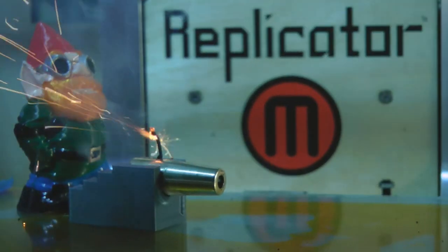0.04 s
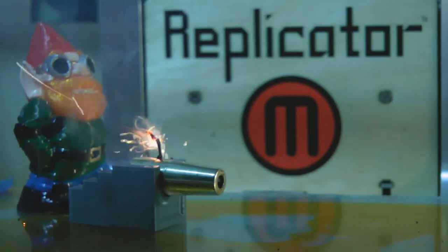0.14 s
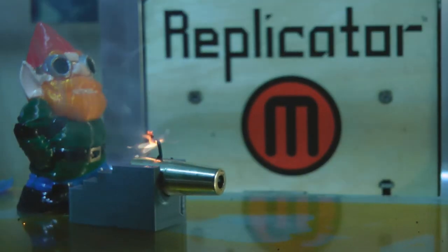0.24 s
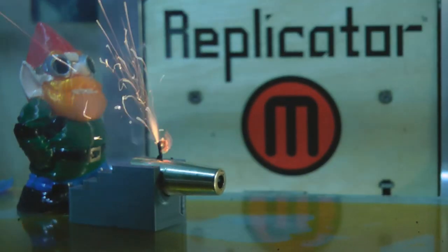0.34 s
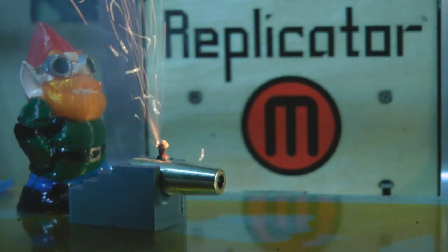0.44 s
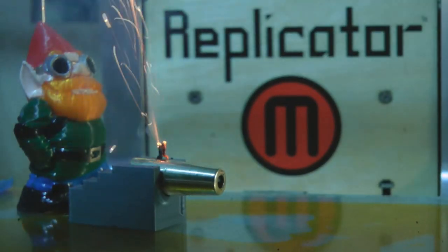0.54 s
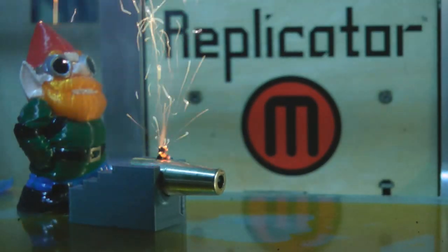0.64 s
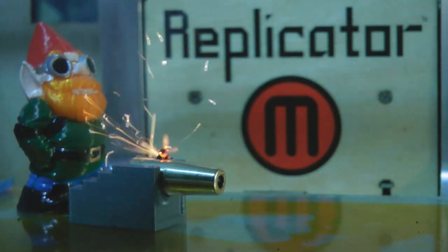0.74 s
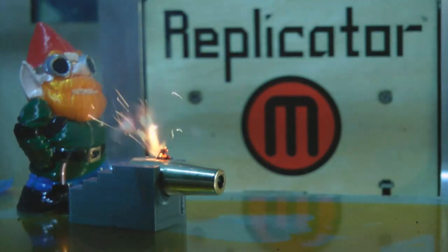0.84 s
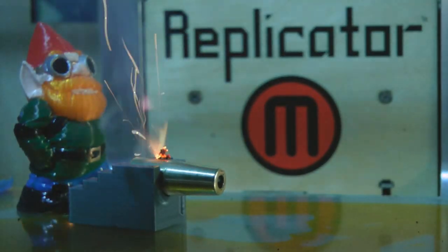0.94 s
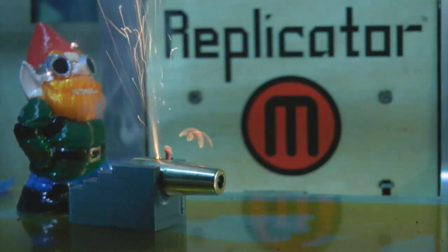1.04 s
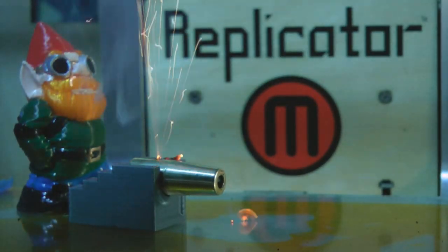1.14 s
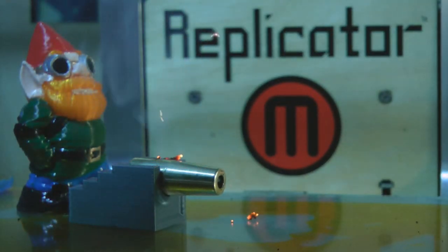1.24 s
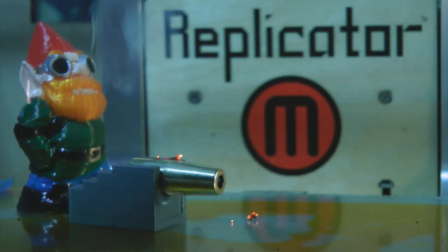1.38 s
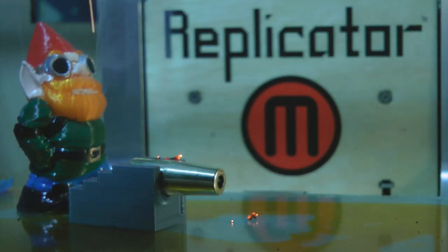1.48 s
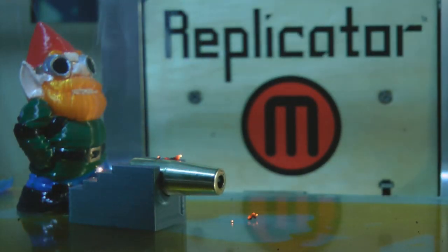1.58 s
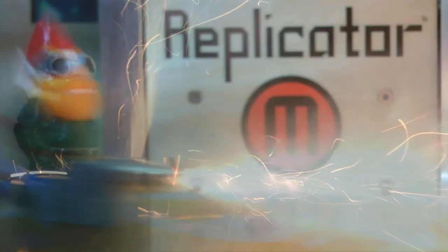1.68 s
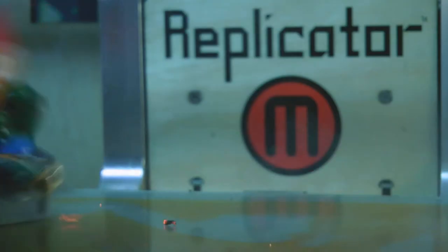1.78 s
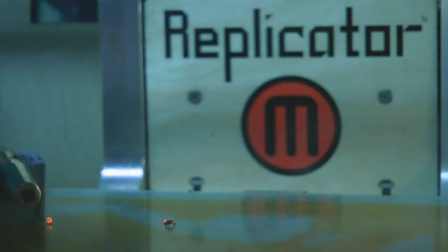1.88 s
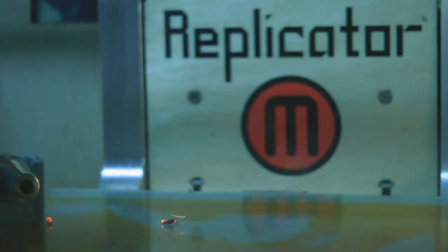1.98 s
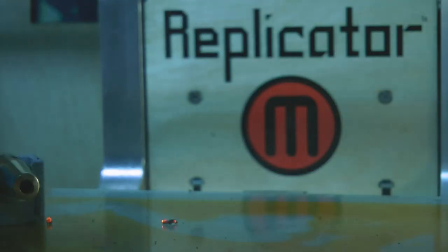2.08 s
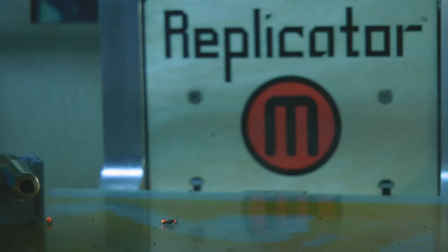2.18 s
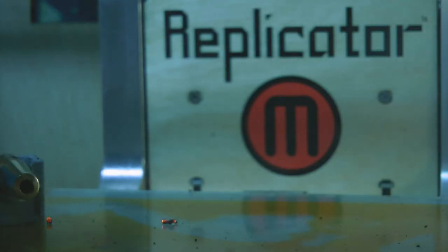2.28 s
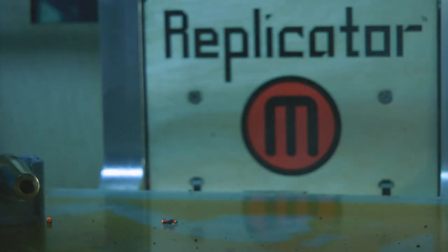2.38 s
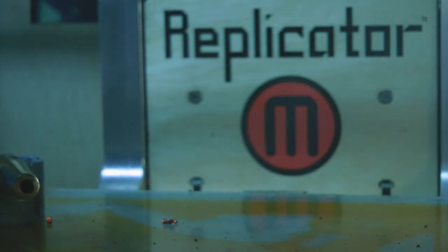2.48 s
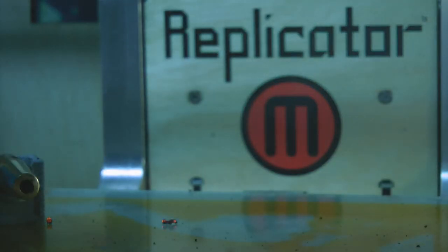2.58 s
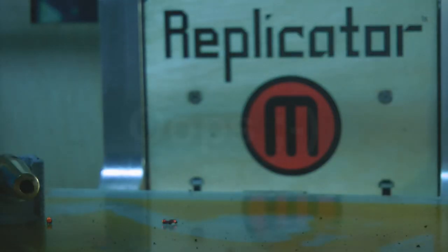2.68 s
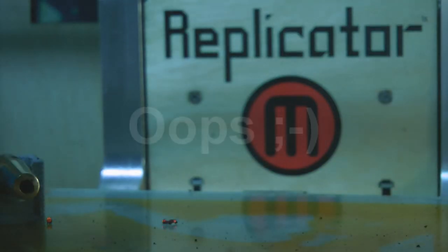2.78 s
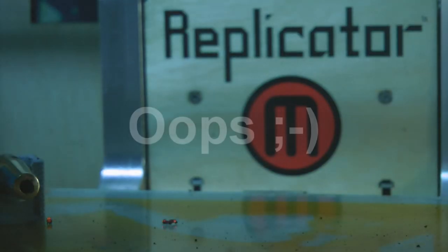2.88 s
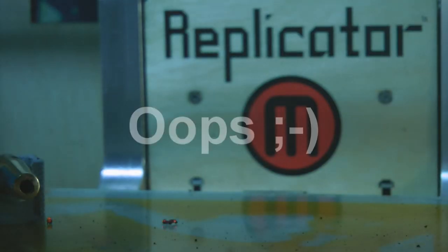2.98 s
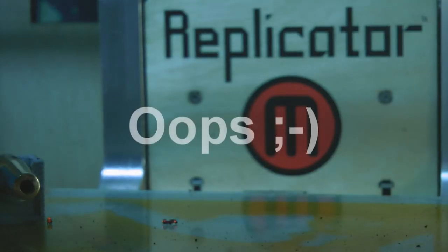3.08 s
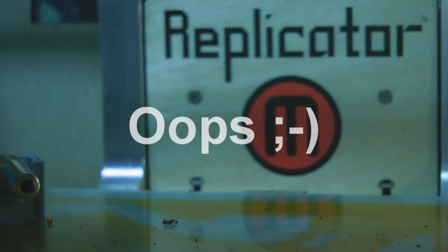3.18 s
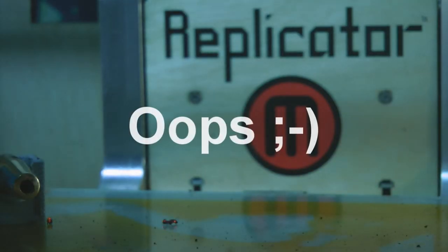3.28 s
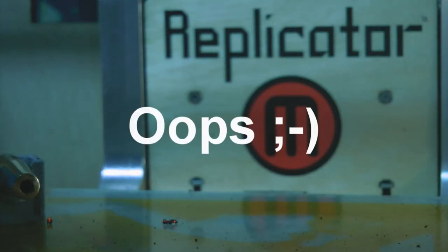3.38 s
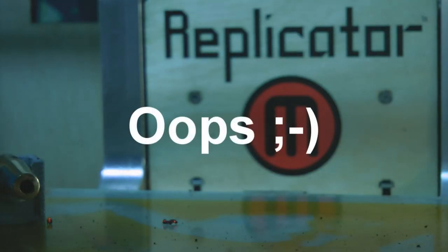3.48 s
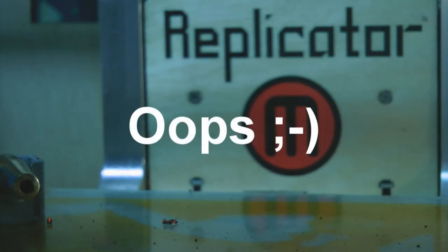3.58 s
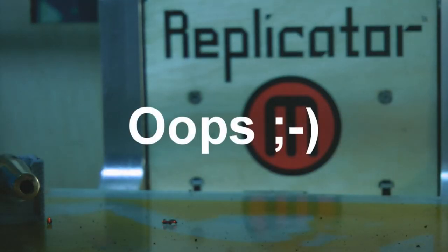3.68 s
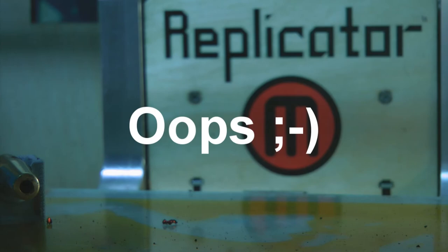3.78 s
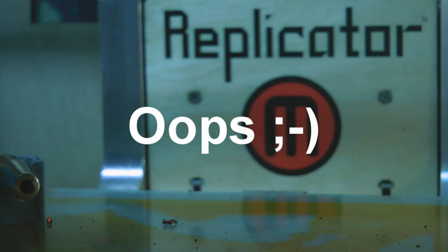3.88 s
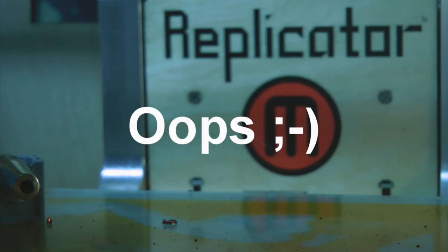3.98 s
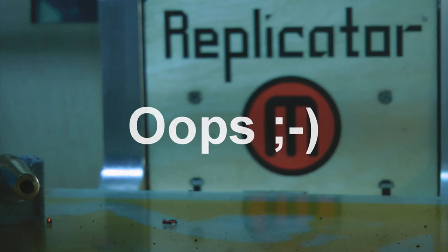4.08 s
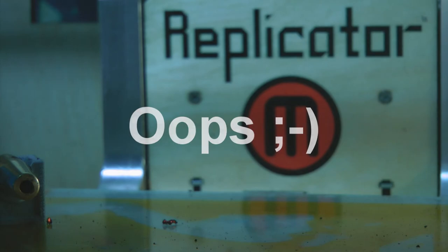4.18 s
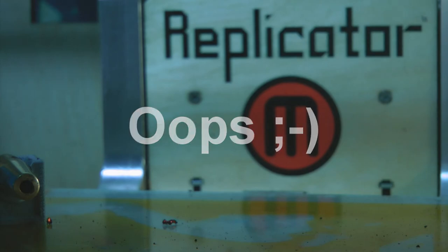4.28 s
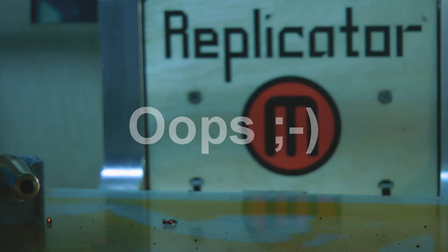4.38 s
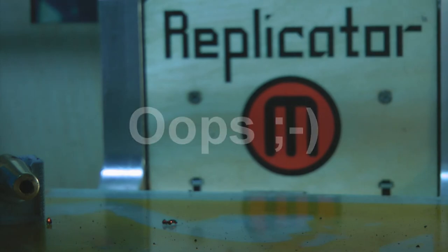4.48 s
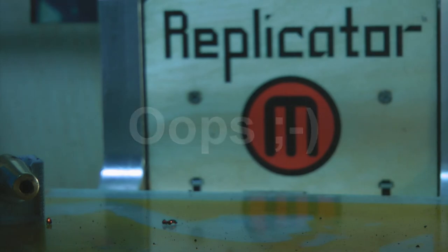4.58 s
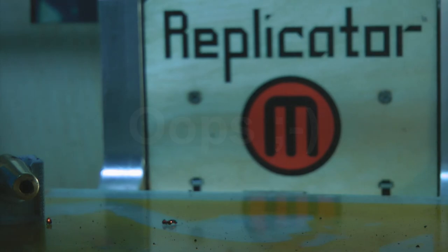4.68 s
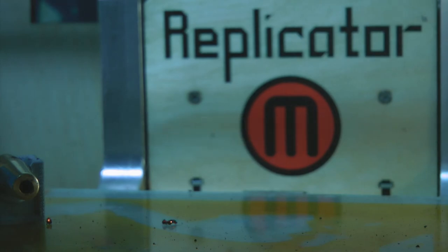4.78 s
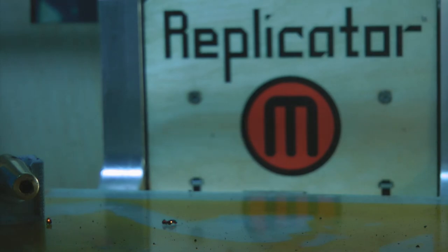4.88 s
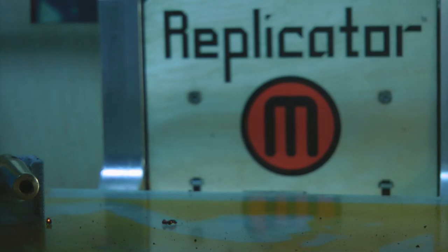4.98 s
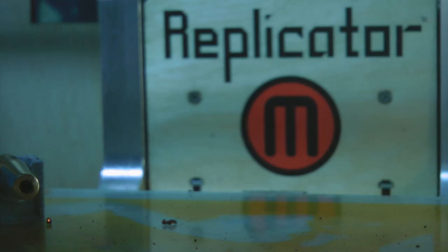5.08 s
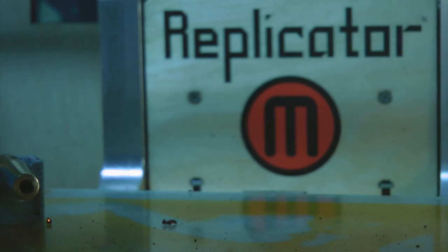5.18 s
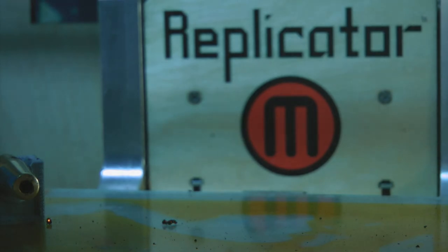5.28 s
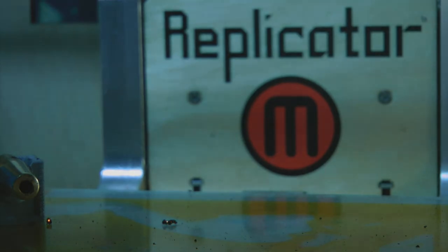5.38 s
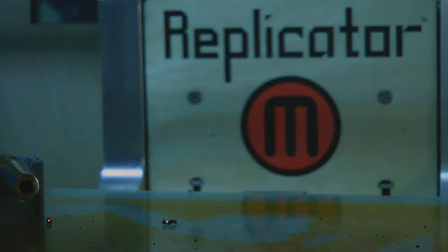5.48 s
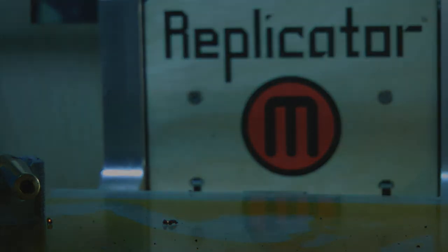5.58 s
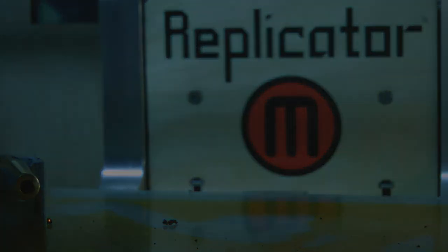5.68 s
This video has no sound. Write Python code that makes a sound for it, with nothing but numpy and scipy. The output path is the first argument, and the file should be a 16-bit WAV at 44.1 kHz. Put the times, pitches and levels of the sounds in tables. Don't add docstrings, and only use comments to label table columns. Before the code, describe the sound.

From the start a fuse burns close to a small microphone: coarse fizzing jet, bright hiss, crackles and irregular spitting puffs, densest until about 1.3 s. The flame sinks into the vent, leaving thin hiss and a few weak ticks. At 1.79 s a toy cannon fires: a dry, ragged, bright crack lasting a few hundredths of a second, with a short table thump and brief faint room tail. At 2.11 s a hollow plastic figure lands with a hard clack, then bounces irregularly until 2.6 s, strong again near 2.25 and 2.5 s, with grit ticking down. A soft wavering ventilation hum shows between blows, dipping after loud ones. Faint bumps and dry scrapes gather from 3.2 s, thickening at 3.65-3.95 s. At 4.15 s something is set down with a hard woody thud, rocking rapidly for a tenth of a second. Small dull taps and quiet hum end it near 5.5 s.

```python
import sys
import numpy as np
from scipy import signal
from scipy.fft import rfft, irfft
from scipy.io import wavfile
from scipy.ndimage import uniform_filter1d

SR = 44100
rng = np.random.default_rng(int(sys.argv[2]) if len(sys.argv) > 2 else 0)


def master_out(mix):
    frames = np.transpose(np.atleast_2d(mix))
    ceiling = np.clip(frames, -1, 1)
    pcm = np.round(ceiling * 32767).astype(np.int16)
    wavfile.write(sys.argv[1], SR, pcm)


def gain_from_db(level_db):
    decades = np.asarray(level_db, float) / 20
    return 10 ** decades


N = 253120


# hz, level_db_per_hz
AIR_SPECTRUM = [(15, -71), (25, -52.5), (89, -46.5), (108, -36), (231, -7.5), (287, -4), (357, -4.5),
                (703, -8.5), (874, -5.5), (1000, -15.5), (3780, -14), (7660, -26.5), (8800, -25.5),
                (9700, -16.5), (11200, -17), (15100, -25), (16400, -45)]
# mid_hz, width_hz, top_db
AIR_RESONANCES = [(77.7, 99.4, 12), (121, 30, 6.5), (360.4, 77, 8), (428, 42, 5.5), (928, 150, -31),
                  (1573, 150, -12.5), (2140, 520, 4), (15300, 1200, 5.5)]
# tone_hz, rms_db
MAINS_HUM = [(120, -86.5), (240, -84), (990, -88)]
# start_s, step_db, drift_back_s
LEVEL_STEPS = [
    (1.82, 4, 0.1),
    (2.112, -7, 0.33),
    (2.25, -3, .15),
    (2.5, 0, 0.17),
    (4.16, -7, .08),
]
AIR_DB, ROAR_LIFT_DB = -59.5, 5

# start_s, dull_db, bright_db, t60_s
GRIT_TICKS = [(2.048, -70, -65, .018), (2.335, -71, -51, 0.02), (2.581, -41, -36, 0.0048),
              (2.584, -53, -48, 0.017), (2.845, -45.5, -48, 0.026), (2.851, -54, -58, 0.11),
              (2.936, -54, -35, 0.01), (3.812, -61, -64.5, .03), (3.84, -86, -55, 0.061),
              (4.155, -55, -49.5, 0.023), (4.166, -58, -47, 0.11), (4.256, -55, -58, .03),
              (4.726, -52, -48.5, 0.039), (4.738, -59, -58, 0.09)]
# hz, level_db_per_hz
GRIT_DULL_SPECTRUM = [(900, -42), (2000, -6), (3600, 1), (6000, -9), (9000, -42)]
# hz, level_db_per_hz
GRIT_BRIGHT_SPECTRUM = [(3000, -26), (6000, -23), (8500, -15), (11100, -8), (15400, -14), (16400, -10.5)]
# start_s, tone_hz, level_db, t60_s
METAL_RINGS = [(2.02, 1115, -58.5, 0.1), (2.3, 235.2, -62, 2.9), (3.38, 572, -57, 0.47),
               (3.862, 2060, -53, 0.3), (4.17, 5200, -63, 0.43)]
# start_s, rise_s, hold_s, level_db
DRAG_EVENTS = [(3.37, 0.051, 0.06, -63.5), (3.51, 0.014, 0.025, -67.5), (3.72, 0.0075, 0.033, -74),
               (3.8, 0.045, 0.014, -49), (3.89, 0.013, 0.35, -72.5), (4.158, 0.0027, 0.016, -49),
               (4.254, 0.0026, 0.0072, -59), (4.42, 0.12, 0.23, -65), (4.68, 0.017, 0.1, -66.5),
               (4.78, 0.018, 0.055, -78)]
# hz, level_db_per_hz
DRAG_SPECTRUM = [(120, -33), (600, 6.5), (1030, -18.5), (1410, -4.5), (2040, -2), (2250, -12), (2660, 1),
                 (3210, -13), (14800, -34), (16400, -58)]
DRAG_RISE_DB, DRAG_FALL_DB_S = 37, 298
# start_s, rise_s, hold_s, level_db
SHUDDER_EVENTS = [(1.93, 0.043, .04, -73), (2.34, 0.028, 0.036, -82), (2.57, 0.023, 0.046, -78),
                  (2.73, 0.025, 0.025, -79.5), (3.62, 0.052, 0.093, -68.5), (3.8, .03, 0.078, -68),
                  (4.55, .06, 0.14, -69)]
# hz, level_db_per_hz
SHUDDER_SPECTRUM = [(20, -20), (45, -11), (110, -6.5), (200, 4), (320, 0), (500, -39)]
SQUEAK_START_S, SQUEAK_LENGTH_S, SQUEAK_DB = 4.123, 0.037, -62
SQUEAK_HZ, SQUEAK_RISE_HZ_S = 10700, 30000

# start_s, peak_db, shell_db, ring_share
BOARD_BUMPS = [(2.743, -49.5, -10.5, 0.32), (3.239, -51.5, -15.5, 0.33), (3.447, -55.5, 6, 0.39),
               (3.473, -48.5, 0, 0.48), (3.652, -47.5, -6.5, 0.58), (3.681, -38.5, -17, 0.66),
               (3.694, -39, -26, 0.23), (3.714, -40, -16, 0.58), (3.758, -45.5, -4, 0.54),
               (3.802, -40, -11, 0.82), (3.817, -39.5, -12, 0.45), (3.837, -51, 6, 0.4),
               (3.848, -44.5, 5, 0.73), (3.94, -39.5, -11, 0.46), (4.373, -48, -4, 0.91),
               (4.64, -48.5, -6, 0.76), (4.924, -46, -9.5, 0.44), (5.083, -51.5, -20.5, 0.78)]
# start_s, peak_db, shell_db, ring_share, struck_spot_hz
SET_DOWN = [(4.1546, -13, -24, 0.34, 485), (4.1622, -22.5, -12, 0.6, 520), (4.172, -35.5, -2.5, 0.72, 560),
            (4.179, -32, -4, 0.55, 420), (4.1915, -29.5, -34, 0.56, 476), (4.209, -33.5, -37, 0.66, 400),
            (4.216, -28.5, -35, 0.85, 430), (4.239, -41.5, -15, 0.37, 475), (4.266, -47, -23, .6, 476)]
# mode_hz, level_db, t60_s
BOARD_LOW_MODES = [(225, -18, 0.03), (303, -9, 0.07), (351, -4, 0.091), (402.6, 3, 0.088), (440, 1, 0.11),
                   (485, 7, 0.045), (520, -4.5, 0.084), (562, -10, 0.073), (680, -6, 0.048),
                   (776, -8, 0.015)]
# mode_hz, level_db, t60_s
BOARD_HIGH_MODES = [(1170, -5.5, 0.076), (1417, -6.5, 0.056), (1870, -6, 0.031), (1983, -0.5, 0.022),
                    (2220, -3.5, 0.026), (2760, -5.5, 0.02), (4070, -31, 0.0067)]
BUMP_LOW_HZ, BOARD_SPOT_HZ = 454, 2100
# hz, level_db_per_hz
CONTACT_SPECTRUM = [(1650, -33.5), (2800, -13.5), (4140, -10), (5780, -18.5), (8300, -31), (10700, -22),
                    (15500, -38), (16400, -19.5)]

# start_s, peak_db, shell_db, ring_share, struck_spot_hz
FIGURE_BOUNCES = [(2.1087, -12, 0.5, 0.53, 1960), (2.125, -15.5, 0, 0.53, 1890),
                  (2.147, -39, -12, .6, 1800), (2.183, -24, -3.5, 1.15, 1430), (2.199, -36, 3, 0.49, 2370),
                  (2.242, -23.5, -1, 0.47, 1990), (2.2485, -17, 8.5, 0.43, 2140),
                  (2.267, -23, -21, 0.61, 1920), (2.281, -29, -7, 0.5, 1300), (2.307, -28, 5, 0.48, 1200),
                  (2.3135, -41, 3, .5, 1450), (2.318, -25.5, -7, 0.76, 1210), (2.468, -24, -8, 1.4, 1440),
                  (2.487, -45.5, -28, 0.73, 2200), (2.5011, -18, 4.5, 0.52, 2220),
                  (2.5127, -39, 8, 0.3, 2000), (2.526, -33.5, -17, 0.56, 2060),
                  (2.572, -36, -12, 0.3, 1420), (2.579, -48, -9, 0.19, 2100), (2.601, -37, -10, 0.43, 1900)]
FIGURE_LOW_HZ = [680, 640, 700, 640, 701, 700, 760, 708, 695, 636, 690, 680, 564, 560, 772, 450, 740, 417,
                 400, 543]
# mode_hz, level_db, t60_s
FIGURE_BODY_MODES = [(329, -6.5, 0.32), (367, -4.5, 0.19), (432.5, -7, 0.18), (572, -13, 0.045),
                     (624, -3, 0.08), (711.2, 4, 0.085), (758, -7, 0.12)]
# mode_hz, level_db, t60_s
FIGURE_SHELL_MODES = [(1238, -9.5, 0.07), (1310, -0.5, 0.017), (1290, -16, 0.044), (1361, -8, 0.075),
                      (1440, -4, 0.022), (1832, -15, 0.065), (1902, -2.5, 0.035), (1963, 0.5, 0.033),
                      (1974, -19, 0.03), (2255, -1.5, 0.03), (2492, 2.5, 0.025), (2630, -24, 0.03),
                      (2700, -4.5, 0.037), (3100, -8, 0.038), (3400, -13.5, 0.052), (3225, -32.5, 0.021)]

# start_s, puff_db, spark_db
FUSE_SPITS = [(0.0278, -14, -46), (0.065, -16, -49), (0.088, -23, -53), (0.1133, -33, -30),
              (0.1258, -45, -56), (0.1477, -21, -28), (0.1865, -39, -34), (0.235, -15, -53),
              (0.2613, -39, -49), (0.3318, -18, -31.5), (0.386, -19, -38), (0.422, -34, -39),
              (0.4663, -49, -54), (0.494, -16.5, -51), (0.51, -40, -27), (0.5339, -16, -31),
              (0.609, -10, -38), (0.688, -19, -33.5), (0.723, -37, -32), (0.7364, -13, -38),
              (0.769, -30, -28), (0.9842, -16, -45), (1.0256, -41, -40), (1.056, -48, -27),
              (1.084, -41, -37), (1.1354, -30, -31), (1.171, -14, -30), (1.2121, -22, -32),
              (1.263, -15, -33), (1.6091, -64, -41), (.217, -19, -44), (0.283, -20, -40), (.303, -19, -49),
              (.4995, -18, -45), (.621, -18, -40), (0.747, -17, -33), (.809, -36, -40), (0.884, -33, -39),
              (.909, -26, -42), (.93, -26, -42), (1.036, -39, -40), (1.107, -31, -45), (1.193, -24, -46),
              (1.223, -18, -40), (1.233, -26, -42), (1.299, -16.5, -48), (1.447, -45, -43),
              (1.566, -50, -54), (1.654, -55, -45)]
# start_s, rise_s, hold_s, level_db
JET_FLARES = [(0.085, 0.024, 0.12, -39.5), (.24, 0.016, 0.061, -54), (.44, 0.037, 0.014, -38.5),
              (.52, 0.043, 0.11, -41), (.705, 0.034, 0.015, -40.5), (.79, 0.05, 0.089, -49),
              (1.07, 0.16, 0.11, -37.5)]
# hz, level_db_per_hz
JET_SPECTRUM = [(290, -54), (500, -14.5), (904, -9.5), (1080, -3), (1270, -17), (1430, -3.5), (2470, -1),
                (2820, 4.5), (3550, -1), (5750, -15), (9000, -15.5), (11700, -39.5), (19800, -120)]
# hz, level_db_per_hz
HISS_SPECTRUM = [(2350, -41), (4000, -5), (5800, -8.5), (7740, -6), (10900, 3.5), (11800, -1), (14900, 1.5),
                 (15800, -6.5), (16400, -23)]
# mid_hz, width_hz, top_db
REFLECTIONS = [(1430, 104, 10.5), (1721, 130, 11.5), (2060, 174, 8), (2860, 190, 3.5), (3196, 150, 5.5),
               (4360, 90, 8), (5050, 88, 6), (5740, 730, 10.5), (7160, 300, 9), (8040, 66, 6.5),
               (8570, 190, 3.5), (9970, 200, 4.5), (11130, 220, 10), (12350, 210, 8.5), (13300, 160, 6),
               (13970, 67, 4.5), (14400, 110, -1), (15500, 300, 10)]
FLARE_RISE_DB, FLARE_FALL_DB_S = 20, 162
JET_DB, EMBER_DB, HISS_DB = -45, -72.5, -46
SINK_S, FIRE_S = 1.23, 1.79
SMOTHER_DB_S, HISS_FADE_DB = 128, 14.5

# start_s, crack_db, thump_db, t60_s
BLAST_PUFFS = [(1.7922, -13, -39.5, .025), (1.7957, -19.5, -41, .032), (1.7978, -13.5, -42, 0.022),
               (1.7995, -8, -40.5, .014), (1.8011, -7.5, -35, 0.01), (1.803, -16, -41, .008),
               (1.8046, -18.5, -36.5, .022), (1.8085, -27, -42.5, .015)]
# hz, level_db_per_hz
GAS_SPECTRUM = [(530, -45), (1000, -23), (1500, -10.5), (2720, -5), (3630, -9), (4310, -8), (7170, -11.5),
                (8710, -7), (11500, -2.5), (15200, -7.5), (16400, -27.5)]
# hz, level_db_per_hz
THUMP_SPECTRUM = [(15, -46), (25, -28), (107, -22.5), (345, 2), (669, -7.5), (757, 3), (857, -33.5),
                  (1000, -20), (1300, -47.5), (2200, -120)]
# start_s, level_db
VENT_SNAPS = [(1.8124, -10), (1.8134, -13), (1.8151, -14), (1.8161, -20), (1.8186, -15)]
# start_s, peak_db, ring_share
CARRIAGE_KICKS = [
    (1.7924, -26.5, 1),
    (1.8012, -14, .3),
    (1.8045, -12.5, 0.24),
    (1.8155, -36, 0.34),
]
# mode_hz, level_db, t60_s
TABLE_MODES = [(65, -30, .06), (130, -29, 0.047), (244.2, 2.5, 0.045), (350, 5.5, 0.0557),
               (430, 2.5, 0.073), (500, -2, 0.036), (560, 0.5, 0.076), (640, -0.5, .04), (716, -2, .04)]
# start_s, level_db, t60_s
BARREL_BARKS = [(1.7988, -17.5, 0.011), (1.8028, -20, 0.021), (1.8056, -27, 0.018)]
# hz, level_db_per_hz
BARK_SPECTRUM = [(900, -29), (1400, -14), (1730, 1.5), (2760, 2), (4200, -3.5), (5500, -18), (8000, -40)]
# time_s, level_db
SHOT_ECHO = [(1.822, -48), (1.845, -54), (1.881, -58), (2.017, -55), (2.1, -60)]
# hz, level_db_per_hz
ECHO_SPECTRUM = [(470, -51), (800, -21.5), (979, -31), (1110, -11), (2900, -1), (8070, -12.5), (10000, -7),
                 (15600, -34), (16400, -49)]


def noise():
    return rng.standard_normal(N)


def colour(x, spectrum, peaks=()):
    hz = np.arange(len(x) // 2 + 1) * SR / len(x) + 1
    points_hz, points_db = np.transpose(spectrum)
    db = np.interp(np.log(hz), np.log(points_hz), points_db)
    for mid_hz, width_hz, top_db in peaks:
        db = db + top_db / (1 + (2 * (hz - mid_hz) / width_hz) ** 2)
    return irfft(rfft(x) * gain_from_db(db), len(x)) / np.sqrt(np.mean(gain_from_db(db) ** 2))


def curve(points):
    time_s, db = np.transpose(points)
    return gain_from_db(np.interp(np.arange(N) / SR, time_s, db, left=-150, right=-150))


def swells(rows, rise_db, fall_db_s):
    out = np.zeros(N)
    for start_s, rise_s, hold_s, db in rows:
        full_s = start_s + rise_s
        end_s = full_s + hold_s
        out += curve([(start_s, db - rise_db), (full_s, db), (end_s, db), (end_s + 40 / fall_db_s, db - 37.5)])
    return out


def walk(rate_hz):
    hold = int(SR / rate_hz)
    levels = np.repeat(rng.standard_normal(N // hold + 1), hold)
    return 1.84 * uniform_filter1d(levels, hold)[:N]


def add(out, start_s, x):
    i = int(start_s * SR)
    out[i:i + len(x)] += x[:N - i]


def bursts(times_s, db, t60_s, rise_s):
    out, t = np.zeros(N), np.arange(4096) / SR
    for start_s, level_db, decay_s in np.broadcast(times_s, db, t60_s):
        add(out, start_s, gain_from_db(level_db - 60 * t / decay_s) * (1 - np.exp(-t / rise_s)))
    return out


def ring(modes, share, scatter_db, detune, contact_s, near_hz, focus_db):
    t = np.arange(12000) / SR
    x = np.zeros(len(t))
    for hz, db, t60_s in modes:
        strength, shift, phase = rng.standard_normal(3)
        mode_db = db + scatter_db * strength - focus_db * abs(np.log2(hz / near_hz))
        tone = np.sin(2 * np.pi * hz * (1 + detune * shift) * t + phase / 3)
        x += gain_from_db(mode_db - 60 * t / (share * t60_s)) * tone
    x = x * (1 - np.exp(-t / contact_s)) ** 2
    return x / np.abs(x).max()


def knocks(events, low, high, bass_hz, contact_s, rattle_s, wet_db, wet_t60_s,
           crack_t60_s, crack_db, crack_slope, sharp):
    out, t = np.zeros(N), np.arange(8000) / SR
    for start_s, db, high_db, share, spot_hz, low_hz in events:
        body = ring(low, share, scatter_db=3.5, detune=0.016, contact_s=contact_s, near_hz=low_hz, focus_db=14)
        shell = ring(high, share, scatter_db=2.0, detune=0.023, contact_s=1.13 * contact_s,
                     near_hz=spot_hz, focus_db=12)
        near = rng.standard_normal(len(t)) * gain_from_db(wet_db - 60 * t / wet_t60_s) * (1 - np.exp(-t / rattle_s))
        near[0] = 1
        add(out, start_s, gain_from_db(db) * signal.fftconvolve(body + gain_from_db(high_db) * shell, near))
    start_s, db, high_db = np.transpose(events)[:3]
    snap_db = crack_db + crack_slope * (db + 30) + sharp * high_db
    crack = bursts(start_s, snap_db, crack_t60_s, 0.00056)
    crack += bursts(start_s, snap_db - 27.5, 1.2 * wet_t60_s, rattle_s)
    out += crack * colour(noise(), CONTACT_SPECTRUM)
    return signal.sosfilt(signal.butter(2, bass_hz, "high", fs=SR, output="sos"), out)


def sinking():
    return np.clip((np.arange(N) / SR - SINK_S) / (FIRE_S - SINK_S), 0, 1)


def gain():
    t = np.arange(N) / SR
    db = ROAR_LIFT_DB * (1 - sinking())
    for start_s, step_db, back_s in LEVEL_STEPS:
        db += step_db * (t > start_s) * np.exp(-np.abs(t - start_s) / back_s)
    return gain_from_db(db)


def room():
    t = np.arange(N) / SR
    air = colour(noise(), AIR_SPECTRUM, AIR_RESONANCES)
    drone = signal.sosfiltfilt(signal.butter(2, 800, fs=SR, output="sos"), air)
    waver, flutter = walk(7), walk(16)
    hum = np.zeros(N)
    for hz, rms_db in MAINS_HUM:
        hum += np.sqrt(2) * gain_from_db(rms_db + 1.3 * waver) * np.sin(2 * np.pi * hz * t)
    wavering_air = air + drone * (gain_from_db(1.4 * flutter) - 1)
    return gain() * gain_from_db(AIR_DB) * wavering_air + hum


def shudders():
    return swells(SHUDDER_EVENTS, 19, 180) * colour(noise(), SHUDDER_SPECTRUM)


def drags():
    rub = swells(DRAG_EVENTS, DRAG_RISE_DB, DRAG_FALL_DB_S) * gain_from_db(2.2 * walk(70))
    return rub * colour(noise(), DRAG_SPECTRUM)


def squeak():
    out, t = np.zeros(N), np.arange(SR) / SR
    t = t[t < SQUEAK_LENGTH_S]
    tone = np.sin(2 * np.pi * (SQUEAK_HZ + SQUEAK_RISE_HZ_S * t / 2) * t)
    add(out, SQUEAK_START_S, gain_from_db(SQUEAK_DB) * tone * np.sin(np.pi * t / SQUEAK_LENGTH_S) ** 0.5)
    return out


def metal_rings():
    out, t = np.zeros(N), np.arange(SR) / SR
    fade = np.minimum(t / 0.0062, 1) * np.clip((0.62 - t) / 0.09, 0, 1)
    for start_s, hz, db, t60_s in METAL_RINGS:
        add(out, start_s, gain_from_db(db - 60 * t / t60_s) * np.sin(2 * np.pi * hz * t) * fade)
    return out


def grit():
    start_s, dull_db, bright_db, t60_s = np.transpose(GRIT_TICKS)
    dull = bursts(start_s, dull_db, t60_s, 0.00047) * noise()
    bright = bursts(start_s, bright_db, t60_s, 0.00032) * noise()
    return colour(dull, GRIT_DULL_SPECTRUM) + colour(bright, GRIT_BRIGHT_SPECTRUM)


def boards():
    events = [(*row[:4], BOARD_SPOT_HZ, BUMP_LOW_HZ) for row in BOARD_BUMPS]
    events += [(*row[:4], BOARD_SPOT_HZ, row[4]) for row in SET_DOWN]
    return knocks(events, BOARD_LOW_MODES, BOARD_HIGH_MODES, bass_hz=199, contact_s=0.0021, rattle_s=0.0044,
                  wet_db=-36.0, wet_t60_s=0.19, crack_t60_s=0.15, crack_db=-59.5, crack_slope=1.0, sharp=0.25)


def figure():
    events = [(*row, low_hz) for row, low_hz in zip(FIGURE_BOUNCES, FIGURE_LOW_HZ)]
    return knocks(events, FIGURE_BODY_MODES, FIGURE_SHELL_MODES, bass_hz=204.8, contact_s=0.0018, rattle_s=0.004,
                  wet_db=-38.0, wet_t60_s=0.14, crack_t60_s=0.018, crack_db=-58.5, crack_slope=2.255, sharp=0.47)


def fuse():
    start_s, puff_db, spark_db = np.transpose(FUSE_SPITS)
    sunk = sinking()
    lit = sunk < 1
    flicker_db = 0.34 * walk(45) + 1.2 * walk(150)
    pop_db = np.minimum(2.0 * rng.exponential(size=N), 7)
    crackle = (rng.random(N) < 900 / SR) * noise() * gain_from_db(pop_db)
    grain = noise() + 1.2 * crackle

    open_jet = np.hypot(gain_from_db(JET_DB), swells(JET_FLARES, FLARE_RISE_DB, FLARE_FALL_DB_S))
    smothered_jet = open_jet * gain_from_db(-SMOTHER_DB_S * (FIRE_S - SINK_S) * sunk)
    flame = np.hypot(smothered_jet, gain_from_db(EMBER_DB)) * lit
    jet = flame * gain_from_db(flicker_db - 3.5) + bursts(start_s, puff_db - 16.0, 0.016, 0.0018)
    hiss = lit * gain_from_db(HISS_DB - HISS_FADE_DB * sunk + 0.77 * flicker_db - 1.2)
    hiss += bursts(start_s, spark_db - 10, 0.016, 0.0011)
    sparks = bursts(start_s, spark_db - 0.5, 0.0071, 0.00068)
    low = colour((jet + 0.41 * sparks) * grain, JET_SPECTRUM, REFLECTIONS)
    high = colour((hiss + sparks) * grain, HISS_SPECTRUM, REFLECTIONS)
    return low + high


def shot():
    start_s, crack_db, thump_db, t60_s = np.transpose(BLAST_PUFFS)
    gas = bursts(start_s, crack_db, t60_s, 0.00013) * noise()
    for snap_s, db in VENT_SNAPS:
        add(gas, snap_s, gain_from_db(db) * np.array([1, -0.5]))
    thump = bursts(start_s, thump_db, 2.0 * t60_s, 0.00059) * colour(noise(), THUMP_SPECTRUM)
    for kick_s, db, share in CARRIAGE_KICKS:
        kick = ring(TABLE_MODES, share, scatter_db=4.2, detune=0.012, contact_s=0.0012, near_hz=400, focus_db=3.5)
        add(thump, kick_s, gain_from_db(db) * kick)
    bark_s, bark_db, bark_t60_s = np.transpose(BARREL_BARKS)
    bark = colour(bursts(bark_s, bark_db, bark_t60_s, 0.0002) * noise(), BARK_SPECTRUM, REFLECTIONS)
    echo = curve(SHOT_ECHO) * gain_from_db(walk(27)) * colour(noise(), ECHO_SPECTRUM)
    return colour(gas, GAS_SPECTRUM) + thump + bark + echo


def scene():
    scraps = shudders() + drags() + squeak() + metal_rings() + grit()
    return (room() + scraps + boards() + figure() + fuse() + shot())[None]


def band_limit(x):
    return signal.sosfilt(signal.butter(12, 16520, fs=SR, output="sos"), x)


def record(dry):
    rounded = 0.8 * np.tanh(dry / 0.8)
    top_cut = signal.ellip(8, 0.3, 34, 15960, fs=SR, output="sos")
    return band_limit(signal.sosfilt(top_cut, rounded))


dry = scene()
out = record(dry)
master_out(out)
```